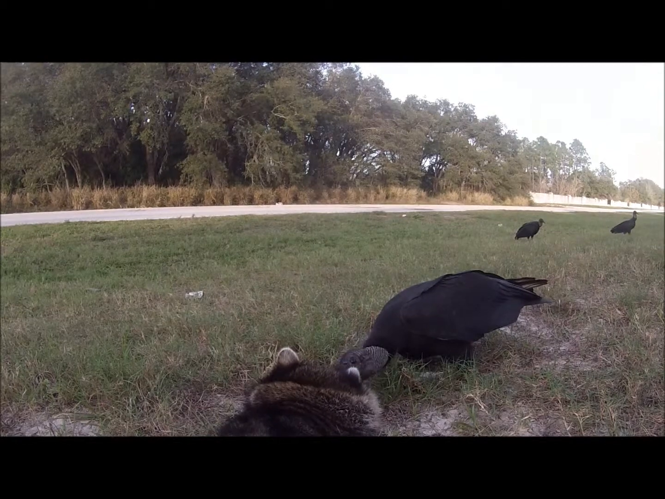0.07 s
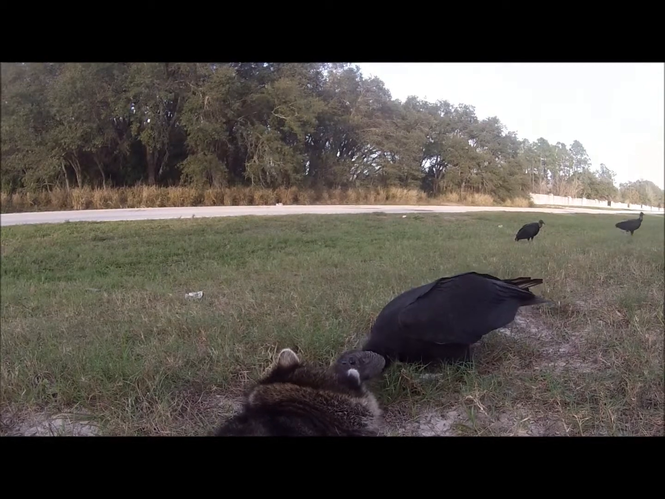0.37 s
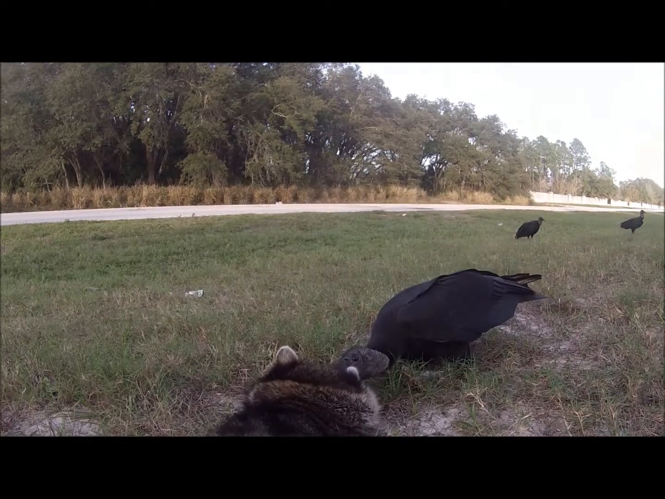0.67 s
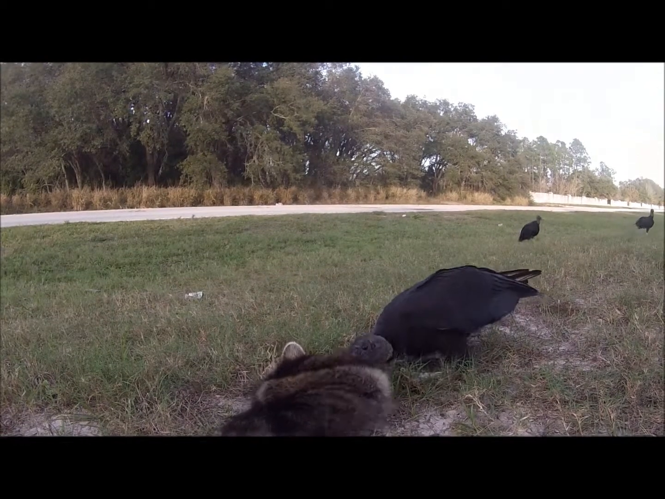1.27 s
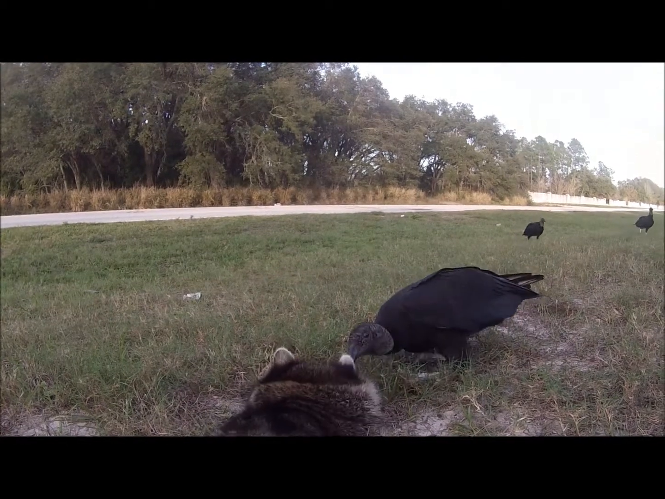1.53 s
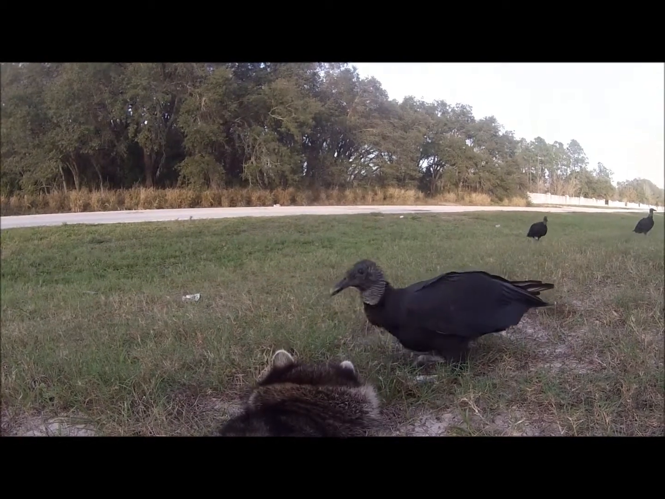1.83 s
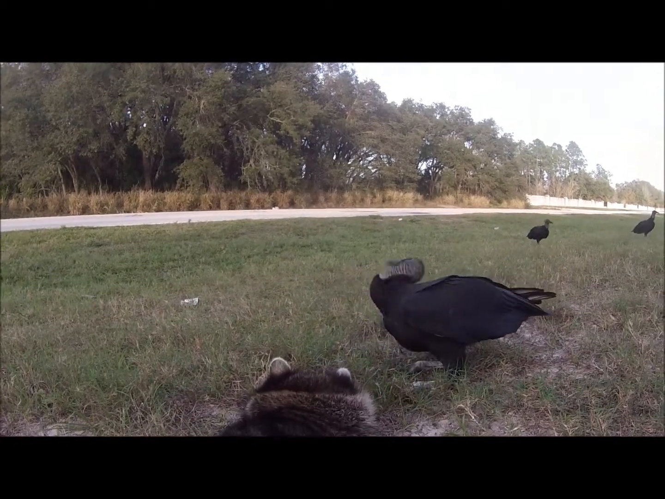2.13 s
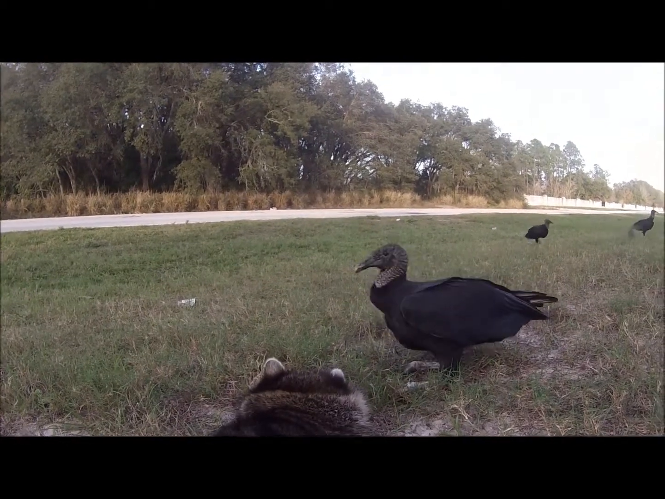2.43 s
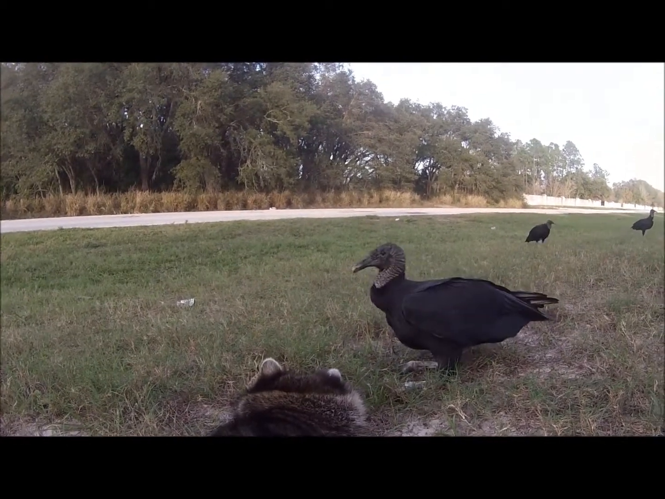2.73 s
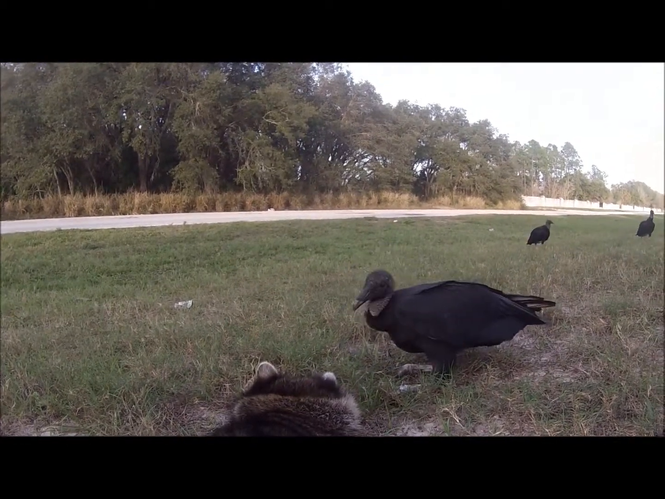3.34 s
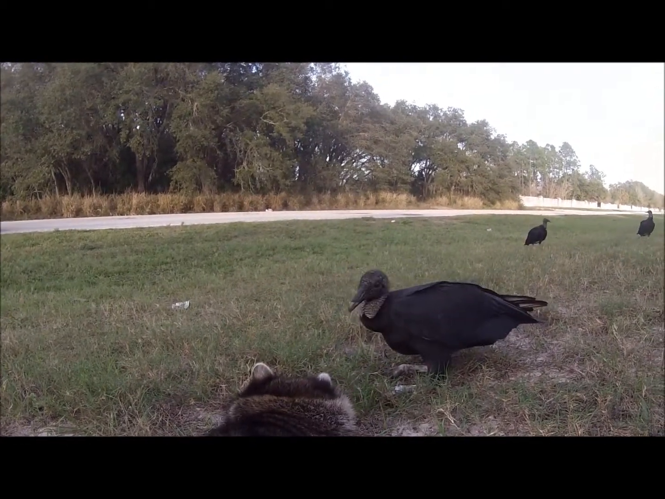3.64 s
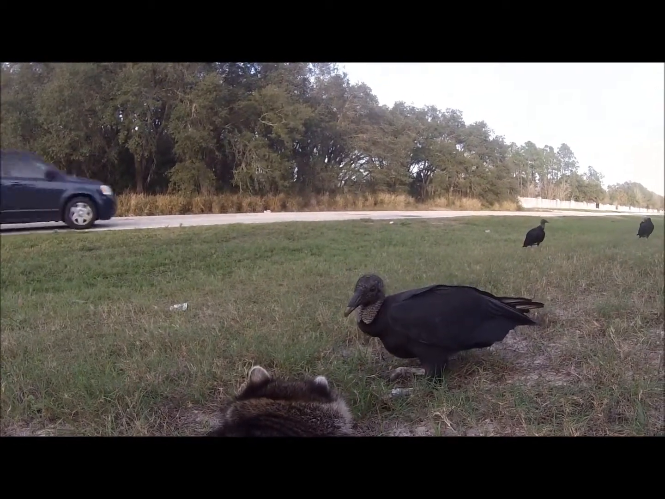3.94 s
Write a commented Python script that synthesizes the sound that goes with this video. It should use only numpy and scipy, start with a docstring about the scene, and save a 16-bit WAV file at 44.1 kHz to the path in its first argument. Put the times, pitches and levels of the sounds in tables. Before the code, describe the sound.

Light wind rumbles on the microphone throughout, over the low drone and hiss of distant traffic, with brief gusts near 1.5, 1.8 and 3.9 seconds. A vulture feeding in the grass makes scattered soft, low thumps, strongest at about 1, 1.7 and 2.1 seconds. Faint ticks of beak and dry stalks and dull grass scuffs come in between. A far car's faint tyre noise slowly grows toward the end.

```python
"""Grass by a road, where a vulture feeds on a carcass.
Light wind rumbles on the microphone over the low drone and hiss of distant traffic.
The tyre noise of a far car slowly grows. The bird tugs, pecks and steps: soft low thumps,
scuffs of pressed grass, faint ticks of beak and dry stalks, one brief rustle."""
import sys
import numpy as np
from scipy import signal
from scipy.fft import rfft, irfft
from scipy.io import wavfile
from scipy.ndimage import uniform_filter1d

SR = 44100
rng = np.random.default_rng(int(sys.argv[2]) if len(sys.argv) > 2 else 0)


def pcm_store(signal):
    """Save signal as 16-bit PCM."""
    levels = np.round(np.clip(np.atleast_2d(signal), -1, 1) * 32767)
    wavfile.write(sys.argv[1], SR, levels.astype(np.int16).T)


N = 176400

# Wind on the microphone. Each row: frequency in Hz, density in dB.
WIND_SPECTRUM = [(10, -16.5), (22, -23.5), (31, 2), (39, 3.5), (45, -2), (54, -10.5), (75, -23),
                 (110, -34.5), (200, -43.5), (1000, -102)]
# Wind strength. Each row: time in seconds, gain in dB.
WIND_GUSTS = [(0, 2), (.35, -6), (.62, -3), (.72, -1.5), (1.06, 6.5), (1.16, -1), (1.46, -3), (1.515, 10),
              (1.575, 10), (1.62, -4.5), (1.74, 5.5), (1.8, 9), (1.865, 6), (1.92, -4.5), (2.3, 2.5),
              (2.45, 2), (2.72, -0.5), (2.85, 1), (3.0, -2), (3.5, 2), (3.8, -5), (3.901, 11), (4, -5)]
# Road drone. Each row: frequency in Hz, density in dB.
DRONE_SPECTRUM = [(25, -5), (50, -3.5), (65, 0), (100, -2), (120, -11.5), (155, -23.5), (185, -22),
                  (230, -32.5), (400, -43), (1500, -65)]
# Hiss of far traffic and air. Each row: frequency in Hz, density in dB.
HISS_SPECTRUM = [(40, -4.5), (180, 2.5), (260, 2.5), (350, 0.5), (550, -1.5), (800, -5), (1400, -6.5),
                 (2000, -10), (2800, -11), (4000, -14.5), (5600, -17.5), (6500, -20), (9000, -23.5),
                 (11500, -27), (13000, -31.5), (15000, -45)]
# Car tyres. Each row: frequency in Hz, density in dB.
TYRE_SPECTRUM = [(200, -38), (700, -9), (1080, -9.5), (1250, -0.5), (1350, 0.5), (1520, 4), (1720, -1.5),
                 (1950, -9), (2600, -12.5), (5000, -33), (12000, -56)]
# Soft blows. Each row: start in seconds, envelope peak in dB, pitch in Hz, rise in cycles.
BIRD_THUMPS = [(0.204, -34.5, 101, 1.75), (0.881, -35.5, 62, 0.45), (0.891, -27.5, 74, 1),
               (1.0232, -19, 54.4, 0.51), (1.248, -29.5, 71.4, 0.72), (1.7375, -19.5, 87, 0.71),
               (1.754, -23.5, 64, 0.49), (1.963, -33.5, 84, 1.1), (2.133, -28, 89, 0.66),
               (2.1481, -15.5, 53.6, 0.55), (2.252, -25.5, 84, 1.15), (2.93, -26.5, 78, 0.74),
               (3.44, -32, 83.6, 1.24), (3.476, -30.5, 69, 0.82)]
# Beak and dry stalks. Each row: start in seconds, level in dB, pitch in Hz, width in octaves.
BEAK_AND_STALK_TICKS = [(0.8546, -57.5, 3340, .85), (1.265, -63, 1900, .7), (1.4051, -48.5, 2320, 0.4),
                        (1.7365, -51, 1150, .8), (3.684, -61, 2700, .6)]
# Grass brushed under the bird. Each row: start in seconds, level in dB.
GRASS_SCUFFS = [(1.256, -50.5), (1.737, -41.5), (3.439, -55), (3.48, -48.5)]
# Pressed grass. Each row: frequency in Hz, density in dB.
SCUFF_SPECTRUM = [(80, 0), (200, 6), (320, -3), (700, -6), (1150, -28), (2200, -29), (8000, -52)]
# Sliding dry grass. Each row: frequency in Hz, density in dB.
RUSTLE_SPECTRUM = [(5000, -25), (9000, -5), (11000, 0), (13000, -5), (15000, -25)]


def amp(db):
    """Decibels to gain."""
    return 10 ** (np.asarray(db) / 20)


def unit_rms(x):
    """Scale to an rms of one."""
    return x / np.sqrt(np.mean(x ** 2) + 1e-20)


def spectrum_db(spectrum, hz):
    """Interpolate a spectrum on a log-frequency axis."""
    knot_hz, knot_db = np.transpose(spectrum)
    return np.interp(np.log(hz + 1), np.log(knot_hz + 1), knot_db)


def add(mix, start_s, sound):
    """Mix a sound in at its start time."""
    part = mix[round(start_s * SR):][:len(sound)]
    part += sound[:len(part)]


def filtered_noise(bin_gains, n=N):
    """Unit-rms noise, weighted per frequency bin."""
    return unit_rms(irfft(rfft(rng.standard_normal(n)) * bin_gains, n))


def noise(spectrum):
    """Unit-rms noise with a tabled spectrum."""
    hz = np.fft.rfftfreq(N, 1 / SR)
    return filtered_noise(amp(spectrum_db(spectrum, hz)))


def drift(rate_hz):
    """Unit-rms random movement up to about rate_hz."""
    hz = np.fft.rfftfreq(N, 1 / SR)
    return filtered_noise(np.exp(-(hz / rate_hz) ** 2))


def wind(level_db=-42, buffet_db=2.5, buffet_hz=4.9):
    """Low turbulence on the microphone, driven by gusts and quick small buffets."""
    rumble = noise(WIND_SPECTRUM)
    power = abs(signal.hilbert(rumble)) ** 2 / 2
    steady_rumble = rumble / np.sqrt(uniform_filter1d(power, size=5000, mode="wrap"))
    gust_db = np.interp(np.arange(N) / SR, *np.transpose(WIND_GUSTS))
    return steady_rumble * amp(level_db + gust_db + buffet_db * drift(buffet_hz))


def road_drone(level_db=-46.5, waver_db=1.5, waver_hz=3.5):
    """Far engines blur into low noise that wavers on the breeze."""
    return amp(level_db + waver_db * drift(waver_hz)) * noise(DRONE_SPECTRUM)


def traffic_hiss(level_db=-60.5, patch_db=0.63):
    """Broad hiss of far traffic and air, with faint drifting patches."""
    hz, _, bins = signal.stft(rng.standard_normal(N), SR, nperseg=1024)
    patches = uniform_filter1d(rng.standard_normal(bins.shape), size=14, axis=0)  # across frequency
    patches = unit_rms(uniform_filter1d(patches, size=7, axis=1))  # across time
    bins *= amp(spectrum_db(HISS_SPECTRUM, hz)[:, None] + patch_db * patches)
    _, hiss = signal.istft(bins)
    return amp(level_db) * unit_rms(hiss[:N])


def car_tyres(level_db=-71.5, approach_db_per_s=2.4):
    """Tyre noise swells steadily as the car nears."""
    swell = amp(approach_db_per_s * np.arange(N) / SR)
    return amp(level_db) * unit_rms(noise(TYRE_SPECTRUM) * swell)


def bird_thumps(shape_exponent=4.2):
    """Each soft blow sets off a low swing that dies within a few cycles."""
    out, t = np.zeros(N), np.arange(SR // 8) / SR
    for start_s, peak_db, hz, rise_cycles in BIRD_THUMPS:
        rise_times = t * hz / rise_cycles
        envelope = (rise_times * np.exp(1 - rise_times)) ** shape_exponent
        add(out, start_s, -amp(peak_db) * envelope * np.sin(2 * np.pi * hz * t))
    return out


def beak_and_stalk_ticks(rise_s=0.0005, decay_s=0.004):
    """Each tiny snap is a broad noise burst around its own pitch."""
    out, t = np.zeros(N), np.arange(SR // 25) / SR
    hz = np.fft.rfftfreq(len(t), 1 / SR)
    envelope = np.minimum(t / rise_s, 1) * np.exp(-t / decay_s)
    for start_s, level_db, pitch_hz, width_oct in BEAK_AND_STALK_TICKS:
        offset_oct = np.log2((hz + 1) / pitch_hz)
        band = 1 / (1 + (offset_oct / width_oct) ** 2) ** 2
        add(out, start_s, amp(level_db) * envelope * filtered_noise(band, len(t)))
    return out


def grass_scuffs(rise_s=0.0007, decay_s=0.007):
    """Grass pressed under the bird gives short dull puffs."""
    out, t = np.zeros(N), np.arange(SR // 8) / SR
    envelope = np.minimum(t / rise_s, 1) * np.exp(-t / decay_s)
    for start_s, level_db in GRASS_SCUFFS:
        add(out, start_s, amp(level_db) * envelope * noise(SCUFF_SPECTRUM)[:len(t)])
    return out


def grass_rustle(start_s=3.15, length_s=0.057, level_db=-79, grain_db=2, grain_hz=150):
    """Dry blades slide past each other in one soft, grainy swell."""
    progress = np.clip((np.arange(N) / SR - start_s) / length_s, 0, 1)
    swell = np.sin(np.pi * progress)
    return swell * amp(level_db + grain_db * drift(grain_hz)) * noise(RUSTLE_SPECTRUM)


def scene():
    """All sources at one microphone."""
    background = wind() + road_drone() + traffic_hiss() + car_tyres()
    vulture = bird_thumps() + beak_and_stalk_ticks() + grass_scuffs() + grass_rustle()
    return (background + vulture)[None]


def record(dry):
    """The recorder's band limit."""
    cutoff_hz = 15150
    lowpass = signal.firwin(511, cutoff_hz, window=("kaiser", 9), fs=SR)
    return signal.oaconvolve(dry, lowpass[None], "same")


dry = scene()
out = record(dry)
pcm_store(out)
```